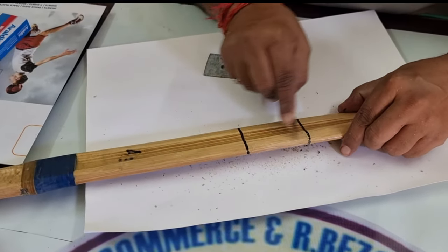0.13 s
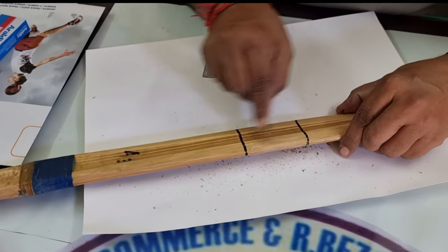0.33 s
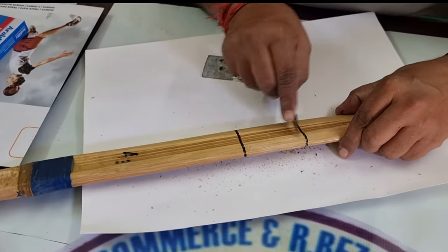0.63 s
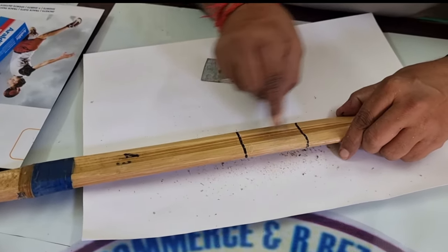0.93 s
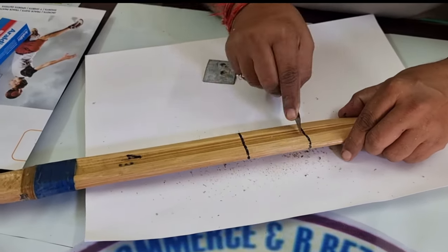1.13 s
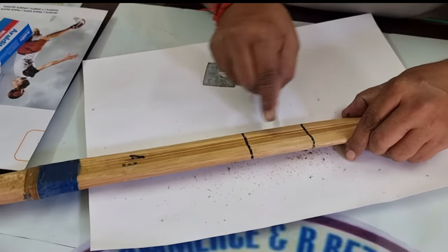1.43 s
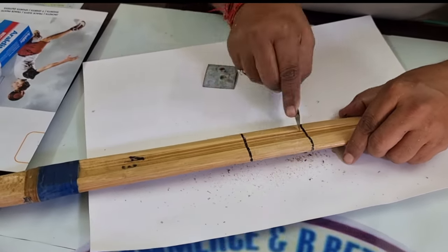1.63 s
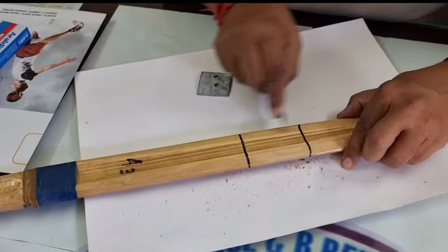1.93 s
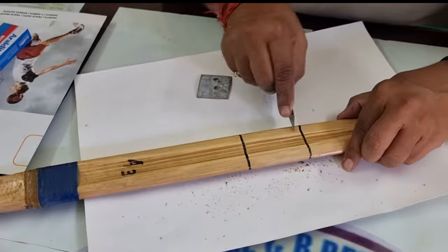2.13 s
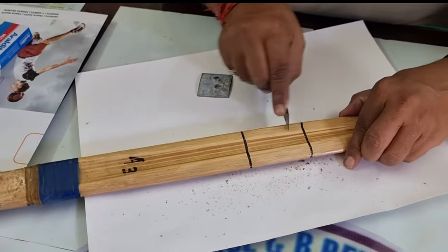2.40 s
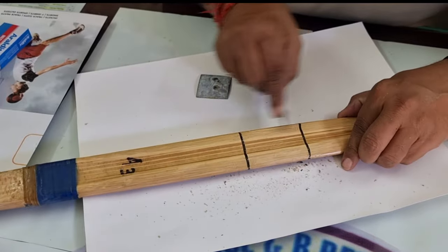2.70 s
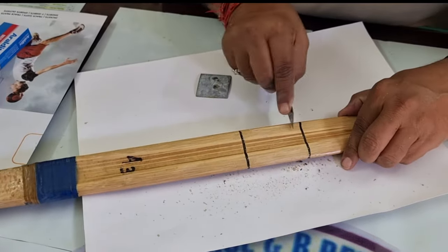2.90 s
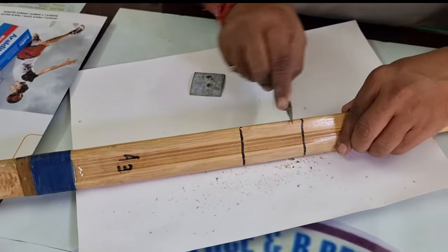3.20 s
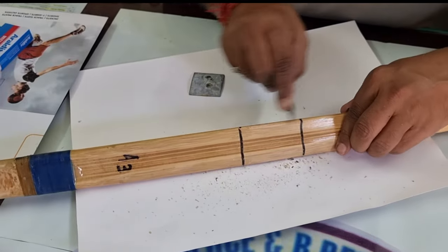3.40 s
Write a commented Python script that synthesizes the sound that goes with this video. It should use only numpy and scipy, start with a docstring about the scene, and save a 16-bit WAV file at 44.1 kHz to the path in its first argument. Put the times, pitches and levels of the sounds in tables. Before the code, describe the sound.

Fast dry scraping on a wooden strip, rasping push then lighter hissy pull, repeated continuously with uneven strength and small catches, heard very close indoors over faint air noise and dull table rumble.

```python
"""Blade scraping a wooden limb

A small blade scrapes to and fro on a wooden limb held down on a table, about four cycles a second.
Each stroke is a rush of tiny fibre fractures ringing blade and wood; pushes dig in, pulls are lighter, thinner.
Now and then the edge snags: a short noise burst. Heard from close by in a small, quiet room:
a faint diffuse tail, a dull rumble of hands and table, faint air noise.
"""
import sys
import numpy as np
from scipy import signal
from scipy.fft import rfft, irfft
from scipy.io import wavfile
from scipy.ndimage import uniform_filter1d, minimum_filter1d

SR = 44100
rng = np.random.default_rng(int(sys.argv[2]) if len(sys.argv) > 2 else 0)


def transcribe(signal):
    """Save signal, clipped to [-1, 1], as a 16-bit WAV file at the path in sys.argv[1]."""
    frames = np.atleast_2d(signal).T
    limited = np.clip(frames, -1, 1)
    pcm = np.round(limited * 32767).astype(np.int16)
    wavfile.write(sys.argv[1], SR, pcm)


N = 156555

# Strokes: start_s, length_s, attack_s, release_s, swell_db (start to end), thrum_db, wood_db, rasp_db,
# hiss_db, fizz_db, sheen_db, ring_early_hz, ring_late_hz
PUSHES = [(0.081, 0.1, 0.056, 0.015, 6.5, -35, -42.5, -35.5, -48.5, -39, -40.5, 2860, 2750),
          (0.329, 0.1, 0.027, 0.04, -1.5, -36, -29, -18, -19, -20, -28.5, 2870, 2770),
          (0.574, 0.091, 0.021, 0.037, 15, -39, -31, -16.5, -19.5, -18.5, -33, 2810, 2660),
          (0.803, 0.11, 0.056, 0.033, -5, -35, -31, -19.5, -25, -23.5, -32.5, 2690, 2790),
          (1.051, 0.1, 0.057, 0.029, -17.5, -41.5, -33.5, -27.5, -34.5, -28, -41, 2800, 2730),
          (1.318, 0.094, 0.038, 0.032, -3.5, -46.5, -28, -19.5, -25, -21.5, -30.5, 2690, 2750),
          (1.565, 0.087, 0.03, 0.045, -3, -41, -30, -20, -24, -19.5, -31.5, 2720, 2600),
          (1.806, 0.11, 0.037, 0.048, -9, -31.5, -23.5, -18, -21.5, -20, -32, 2600, 2330),
          (2.057, 0.11, 0.063, 0.049, -11.5, -37, -29.5, -25, -23, -19, -38, 2780, 2560),
          (2.305, 0.11, 0.035, 0.033, -10.5, -41, -32.5, -23, -24, -22, -35.5, 2810, 2910),
          (2.571, 0.086, 0.027, 0.019, -8, -46, -34.5, -31.5, -31.5, -27, -43, 2880, 3140),
          (2.825, 0.097, 0.03, 0.041, -1, -42.5, -36.5, -32, -36, -25.5, -38, 2700, 2930),
          (3.088, 0.088, 0.062, 0.037, 2, -40, -30, -26.5, -29, -18.5, -39, 3000, 3380),
          (3.347, 0.109, 0.038, 0.05, -5, -40, -46.5, -53, -60, -41, -44, 2800, 3080)]
PULLS = [(0.207, 0.097, 0.031, 0.038, 21, -50, -38, -29, -27.5, -30.5, -35, 2430, 2320),
         (0.457, 0.099, 0.043, 0.035, -0.5, -55.5, -37, -40.5, -28.5, -28, -46, 2220, 2280),
         (0.686, 0.11, 0.045, 0.045, -5.5, -48.5, -38, -26, -25, -31.5, -38, 2430, 2400),
         (0.924, 0.12, 0.045, 0.043, 0, -50.5, -41, -41.5, -31, -36.5, -48, 2520, 2170),
         (1.144, 0.096, 0.033, 0.016, 1.5, -65.5, -47, -45.5, -44, -49.5, -54, 2170, 2080),
         (1.434, 0.079, 0.055, 0.039, 11, -55, -42, -31, -38.5, -63, -53, 2750, 2370),
         (1.663, 0.12, 0.032, 0.06, -3.5, -53.5, -35, -34.5, -30.5, -38.5, -54, 2450, 2340),
         (1.909, 0.12, 0.023, 0.056, 23.5, -53, -45, -31.5, -32, -38.5, -45, 2420, 2460),
         (2.192, 0.094, 0.061, 0.041, 2.5, -54.5, -43.5, -34.5, -26, -24, -58, 2380, 2430),
         (2.428, 0.1, 0.037, 0.043, 0, -48.5, -32, -25.5, -21, -24, -32, 2300, 2550),
         (2.689, 0.097, 0.024, 0.031, 15, -51, -40, -31, -26, -25, -34, 2403, 2440),
         (2.952, 0.099, 0.036, 0.052, 3, -58, -46.5, -39, -30, -29, -40, 2440, 2350),
         (3.197, 0.11, 0.033, 0.039, 29, -38.5, -46.5, -29, -33, -32, -41, 2300, 2350),
         (3.495, 0.13, 0.079, 0.023, 10, -37, -43, -34, -27.5, -27.5, -23, 2590, 2340)]
# Borders between thrum, wood, rasp, hiss, fizz and sheen: border_hz
BAND_BORDERS_HZ = [1000, 2000, 3400, 6700, 11300]
# Delay of each band behind the stroke, thrum to sheen; the wood answers once pressure builds: lag_s
PUSH_LAGS_S = [0.0049, 0.005, -0.00055, 0.0011, -0.0027, 0.0013]
PULL_LAGS_S = [0.009, 0.0075, 0.001, 0.0023, .001, .002]
# How sharply each band follows the bite, thrum to sheen: exponent
BITE_EXPONENTS = [1.27, 0.9, 0.99, 0.94, 1.24, 1.3]
# Colour of each direction with the first and the later grip: freq_hz, colour_db
PUSH_FIRST_GRIP = [(120, -73), (200, -39.5), (365, -28.5), (446, -13.5), (702, -28), (812, -29),
                   (957, -21.5), (1070, -31), (1350, -18.5), (1450, -22), (1710, -11.5), (2020, -18),
                   (2650, 2.5), (2960, 1), (3300, -8.5), (4180, -7.5), (5010, -18.5), (5590, -14),
                   (6830, -24), (7620, -7), (8200, -13), (8980, -4.5), (10600, -1), (11400, -11),
                   (15500, -26)]
PUSH_LATER_GRIP = [(120, -69), (200, -31), (479, -9), (641, -29), (957, -49), (1030, -12.5), (1130, -15),
                   (1230, -3), (1430, -13.5), (1740, 4), (1980, -17.5), (2170, -3.5), (2290, -19),
                   (2850, 5), (3300, -2.5), (3820, 3), (4660, -16), (5390, -18.5), (6240, -7), (6960, -22),
                   (8200, -20.5), (9660, -3), (10800, -5), (11800, -12), (15500, -22)]
PULL_FIRST_GRIP = [(120, -69), (200, -40.5), (358, -27), (534, -30.5), (690, -19), (842, -41.5),
                   (1210, -15), (1330, -21), (1710, -7.5), (1910, -21), (2090, 1), (2420, 6.5), (2700, 1.5),
                   (3300, -9), (4330, -9), (4920, -23.5), (6020, -15), (6710, -27.5), (7220, -18),
                   (7760, -24), (10400, -7), (11600, -25), (12700, -19), (13600, -32), (15500, -37.5)]
PULL_LATER_GRIP = [(120, -76), (200, -46), (321, -27.5), (554, -51), (677, -32.5), (798, -29), (940, -21.5),
                   (1050, -25.5), (1260, -31), (1450, -45.5), (1740, -5), (1980, -22.5), (2210, -5.5),
                   (2330, 4.5), (3300, -1.5), (3890, 4.5), (4330, -4.5), (4920, -26), (5700, -3.5),
                   (7090, -17.5), (9140, -5.5), (10400, 5.5), (11600, -14), (12700, -14), (15500, -44)]
# Colour of both directions once the blade is turned a little flatter: freq_hz, colour_db
TURNED_BLADE = [(120, -45), (200, -29.5), (358, -6.5), (515, -15.5), (665, -3.5), (812, -19.5), (940, -7),
                (1050, -21.5), (1350, -7.5), (1560, -26), (1810, -19.5), (1980, -28), (2290, -5.5),
                (2650, -17), (3120, -6.5), (3750, 6.5), (4180, 3), (4580, -12), (5800, -2.5), (7090, -34),
                (7760, -25.5), (10000, -30.5), (10800, -22.5), (12500, -20.5), (15500, -35)]
# Modes of the limb: mode_hz, width_hz, lift_db
LIMB_MODES = [(344, 23, 3), (502, 18, 7), (954, 23, 3.5), (1333, 15, 4.5), (1432, 26, 3.5),
              (1518, 13, -2.5), (1880, 140, 1), (2345, 23, 2), (2590, 40, -3), (3710, 28, 0.5),
              (4580, 13, 4.5), (9600, 68, 2), (10850, 200, -1)]
# The edge catches on the grain: start_s, level_db
SNAGS = [(.024, -36.5), (.033, -40.5), (.223, -21.5), (0.246, -34), (.343, -13), (.382, -12.5), (0.613, -8),
         (.631, -13.5), (.827, -20), (.961, -32), (0.996, -13), (1.074, -11.5), (1.187, -27), (1.479, -44),
         (1.49, -29), (1.497, -32), (1.582, -15.5), (1.708, -21), (1.725, -10), (1.854, -7.5), (1.935, -22),
         (1.966, -11.5), (2.319, -22), (2.457, -9), (2.679, -59), (2.73, -10), (2.841, -25.5),
         (2.883, -15.5), (2.935, -45), (2.984, -19.5), (3.193, -52), (3.211, -22.5), (3.229, -18),
         (3.355, -43), (3.46, -41)]
# Decay of the room: freq_hz, t60_s
ROOM_DECAY = [(200, 0.8), (1000, 0.55), (4000, 0.25), (9000, 0.14), (15000, 0.056)]
# Dull rumble of hands and table: freq_hz, colour_db
RUMBLE_COLOUR = [(20, -40), (50, -1.5), (110, 2.5), (200, -4), (400, -11.5), (900, 0.5), (3000, -42),
                 (16000, -55)]
# Faint air noise: freq_hz, colour_db
AIR_COLOUR = [(20, -10), (200, -4), (800, -5), (1500, 0), (4000, 0), (10000, -7.5), (16000, -37)]

AIR_DB, ROOM_DB = -68, -25
RUMBLE_DB, RUMBLE_SWELL_DB, RUMBLE_SWELL_HZ = -62, 3.5, 18
GRIP_FROM_S, GRIP_TO_S = 1.86, 2.67  # the hand shifts its grip
TURN_S = 3.19  # strokes and snags after this use the turned blade
SHIFT_DB, SHIFT_WIDTH_HZ = 4, 260  # resonances wax and wane as the contact point travels
RING_DB, RING_WIDTH_HZ = 9, 180  # blade ring
SNAG_RISE_S, SNAG_FALL_S = 0.00036, 0.0038
FRACTURES_PER_S, SIZE_SPREAD_DB = 4000, 3
SMOOTH_SHARE = 0.39  # smooth friction, as a share of power
JUDDER_DB, JUDDER_HZ, CHATTER_DB, CHATTER_HZ = 2.44, 69.6, 3.5, 223
GRIP_LIMIT_DB = 2  # upper limit of the random rise in grip
BRUSH_DB, BRUSH_LEAD_S, BRUSH_TRAIL_S = -30, 0.011, 0.013  # edge skims before and after the bite
CEILING = 0.95  # peak amplitude at which the gain starts to ease
LOW_CUT_HZ, HIGH_CUT_HZ = 25, 15700
TAPS = 4096  # length of a body response, samples
HZ = np.fft.rfftfreq(TAPS, 1 / SR)


def amp(db):
    """Decibels to gain."""
    return 10 ** (np.asarray(db) / 20)


def unit(x):
    """Scales to rms 1."""
    return x / np.sqrt(np.mean(x ** 2) + 1e-20)


def read(points, hz):
    """Reads a table on a log-frequency axis."""
    points_hz, value = np.transpose(points)
    return np.interp(np.log(hz + 1), np.log(points_hz + 1), value)


def add(mix, start_s, sound):
    """Mixes a sound in at start_s."""
    part = mix[max(round(start_s * SR), 0):][:len(sound)]
    part += sound[:len(part)]


def ramp(u):
    """Smooth rise from 0 to 1."""
    return np.sin(np.pi / 2 * np.clip(u, 0, 1)) ** 2


def wander(rate_hz):
    """Random unevenness, rms 1: noise rolled off above rate_hz."""
    spectrum = rfft(rng.standard_normal(N))
    rolloff = (1 + (np.fft.rfftfreq(N, 1 / SR) / rate_hz) ** 2) ** 2
    return unit(irfft(spectrum / rolloff, N))


def noise(colour):
    """Steady noise of a given colour, rms 1."""
    spectrum = rfft(rng.standard_normal(N))
    return unit(irfft(spectrum * amp(read(colour, np.fft.rfftfreq(N, 1 / SR))), N))


def air():
    """Faint steady air noise."""
    return amp(AIR_DB) * noise(AIR_COLOUR)


def rumble():
    """Dull noise of hands and table, its level wandering."""
    swell = amp(RUMBLE_SWELL_DB * wander(RUMBLE_SWELL_HZ))
    return amp(RUMBLE_DB) * unit(noise(RUMBLE_COLOUR) * swell)


def room(x):
    """A short diffuse tail: noise whose treble dies first."""
    hz, t, z = signal.stft(rng.standard_normal(SR // 2), SR, nperseg=256)
    decay = amp(-60 * t / read(ROOM_DECAY, hz)[:, None])
    tail = signal.istft(z * decay, SR, nperseg=256)[1]
    tail = tail * np.minimum(np.arange(len(tail)) / SR / 0.0027, 1)  # onset over 2.7 ms
    return amp(ROOM_DB) * signal.fftconvolve(x, tail / np.linalg.norm(tail))[:N]


def causal(gain):
    """Minimum-phase response of a ringing body with this gain."""
    log_gain = np.log(np.maximum(gain, gain.max() * 1e-5))
    circle = np.concatenate([log_gain, log_gain[-2:0:-1]])
    return np.exp(np.conj(signal.hilbert(circle)))[:len(gain)]


def body(first, later, s):
    """Gain of blade and limb at time s: grip or turned-blade colour, plus the limb modes."""
    grip = np.clip((s - GRIP_FROM_S) / (GRIP_TO_S - GRIP_FROM_S), 0, 1)
    if s > TURN_S:
        colour_db = read(TURNED_BLADE, HZ)
    else:
        colour_db = (1 - grip) * read(first, HZ) + grip * read(later, HZ)
    modes_db = sum(lift_db / (1 + (2 * (HZ - mode_hz) / width_hz) ** 2)
                   for mode_hz, width_hz, lift_db in LIMB_MODES)
    return amp(colour_db + modes_db)


def contact():
    """Random lift and dip of the resonances at one point of contact, in dB."""
    rough = rng.standard_normal(len(HZ))
    kernel = np.exp(-(2 * (HZ[:201] - HZ[100]) / SHIFT_WIDTH_HZ) ** 2)
    return SHIFT_DB * unit(signal.fftconvolve(rough, kernel, "same"))


def bands():
    """Overlapping bands that sum to one."""
    below = [1 / (1 + (HZ / hz) ** 14) for hz in BAND_BORDERS_HZ]
    return np.diff([0 * HZ] + below + [0 * HZ + 1], axis=0)


def blade_ring(x, hz, width_hz):
    """A resonance of gain 1 that follows the curve hz."""
    turn = np.exp(2j * np.pi * np.cumsum(hz) / SR)
    pole = np.exp(-np.pi * width_hz / SR)
    # Shift the ring to 0 Hz, smooth, shift back
    return 2 * (turn * signal.lfilter([1 - pole], [1, -pole], x / turn)).real


def snag(start_s, level_db):
    """The edge catches and lets go: a short burst, push-coloured during a push, otherwise pull-coloured."""
    pushing = any(row[0] < start_s < row[0] + row[1] for row in PUSHES)
    first, later = (PUSH_FIRST_GRIP, PUSH_LATER_GRIP) if pushing else (PULL_FIRST_GRIP, PULL_LATER_GRIP)
    impulse = irfft(causal(unit(body(first, later, start_s))))
    t = np.arange(TAPS // 2) / SR
    envelope = np.minimum(t / SNAG_RISE_S, 1) * np.exp(-t / SNAG_FALL_S)
    burst = envelope * rng.standard_normal(len(t))
    return start_s, amp(level_db) * signal.fftconvolve(burst, impulse)


def fractures():
    """Force at the edge: fibres snapping in clumps, over smooth friction."""
    sizes_db = SIZE_SPREAD_DB * np.minimum(rng.exponential(1, N), 3.3)
    sizes = amp(sizes_db) * rng.choice([-1, 1], N)
    snaps = unit(sizes * (rng.random(N) < FRACTURES_PER_S / SR))
    force = np.sqrt(1 - SMOOTH_SHARE) * snaps + np.sqrt(SMOOTH_SHARE) * rng.standard_normal(N)
    grip_db = JUDDER_DB * wander(JUDDER_HZ) + CHATTER_DB * wander(CHATTER_HZ)
    limited_db = np.minimum(grip_db, GRIP_LIMIT_DB * np.tanh(abs(grip_db) / GRIP_LIMIT_DB))
    return unit(force * amp(limited_db))


def stroke(force, row, first, later, lags_s):
    """One pass of the blade: the bite rises and falls while the fractures ring blade and limb."""
    start_s, length_s, attack_s, release_s, swell_db, *levels_db, early_hz, late_hz = row
    lead, pad = TAPS // 2, TAPS // 16  # samples before the stroke; room for pre-ringing of the bands
    t = (np.arange(TAPS * 3) - lead) / SR
    drive = np.take(force, round(start_s * SR) - lead + np.arange(len(t)), mode="wrap")
    travel = np.clip(t / length_s, 0, 1)
    near, far = (causal(body(first, later, start_s) * amp(contact())) for _ in range(2))
    ring_hz = early_hz + (late_hz - early_hz) * ramp(2 * travel - 0.5)
    out = 0
    for band, level_db, lag_s, exponent in zip(bands(), levels_db, lags_s, BITE_EXPONENTS):
        u = t - lag_s
        bite = (ramp(u / attack_s) * ramp((length_s - u) / release_s)) ** exponent
        bite = bite * amp(swell_db * (travel - 0.5))
        brush = amp(BRUSH_DB) * ramp(u / BRUSH_LEAD_S + 1) * ramp((length_s - u) / BRUSH_TRAIL_S + 1)
        effort = np.hypot(bite, brush)
        sound = 0
        for response, weight in ((near, 1 - travel), (far, travel)):
            impulse = np.roll(irfft(response * band), pad)
            sound = sound + signal.fftconvolve(drive * effort * weight, impulse)[pad:][:len(t)]
        sound = sound + (amp(RING_DB) - 1) * blade_ring(sound, ring_hz, RING_WIDTH_HZ)
        out = out + amp(level_db) * np.sqrt(np.mean(effort ** 2)) * unit(sound)
    return start_s - lead / SR, out


def scene():
    """Strokes and snags in the room, over table rumble and faint air."""
    force, blade = fractures(), np.zeros(N)
    for row in PUSHES:
        add(blade, *stroke(force, row, PUSH_FIRST_GRIP, PUSH_LATER_GRIP, PUSH_LAGS_S))
    for row in PULLS:
        add(blade, *stroke(force, row, PULL_FIRST_GRIP, PULL_LATER_GRIP, PULL_LAGS_S))
    for row in SNAGS:
        add(blade, *snag(*row))
    return (blade + room(blade) + rumble() + air())[None]


def record(dry):
    """Eases the gain under the highest peaks, then limits the band."""
    gain = CEILING / np.maximum(abs(dry), CEILING)
    gain = uniform_filter1d(minimum_filter1d(gain, size=129), size=129)
    low_cut = signal.butter(2, LOW_CUT_HZ, "high", fs=SR, output="sos")
    held = signal.sosfilt(low_cut, dry * gain)
    high_cut = signal.firwin(401, HIGH_CUT_HZ, window=("kaiser", 9), fs=SR)
    return signal.oaconvolve(held, high_cut[None], "same")


dry = scene()
out = record(dry)
transcribe(out)
```